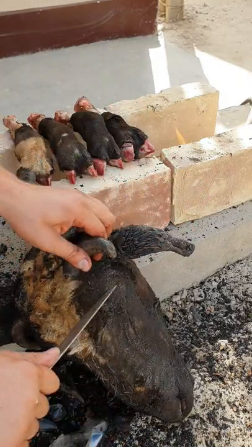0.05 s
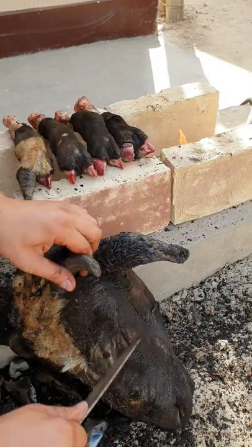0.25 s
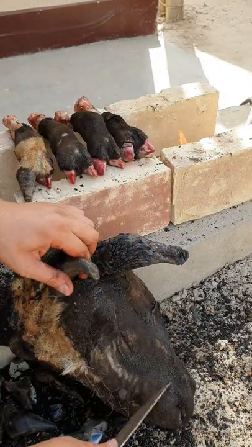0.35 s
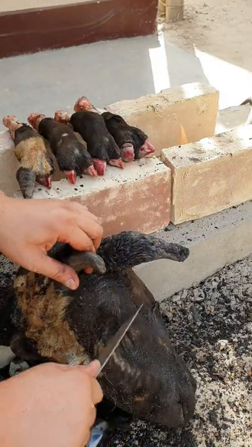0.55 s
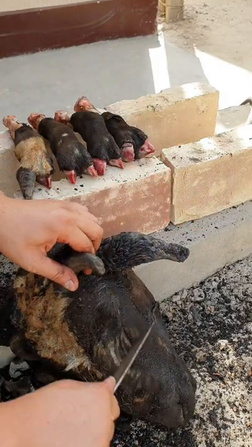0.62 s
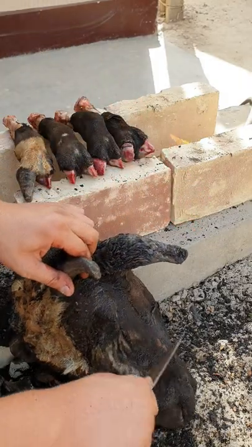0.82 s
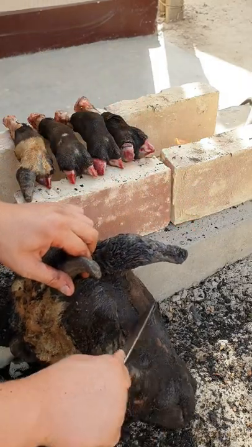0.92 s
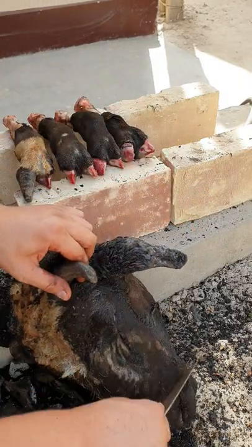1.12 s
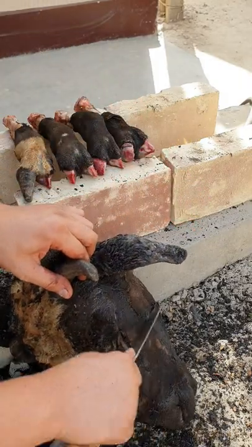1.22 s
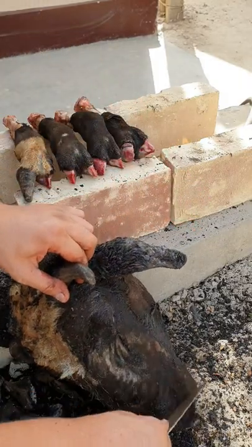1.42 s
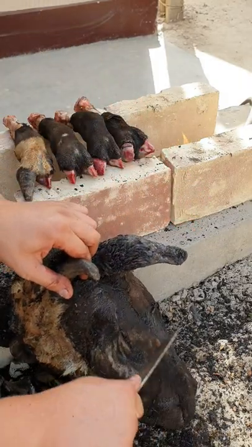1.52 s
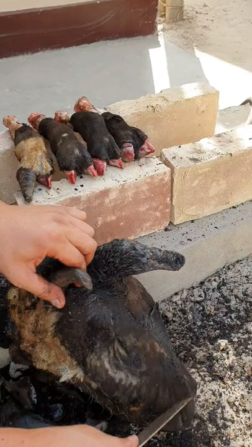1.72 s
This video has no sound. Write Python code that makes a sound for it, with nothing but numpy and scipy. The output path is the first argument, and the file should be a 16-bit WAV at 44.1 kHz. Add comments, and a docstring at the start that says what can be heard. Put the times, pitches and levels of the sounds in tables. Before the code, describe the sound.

Gritty knife scraping on charred skin, with a couple of loud, hollow metal bangs.

```python
"""Knife on charred hide, with banging sheet metal

A knife scrapes the charred hide of an animal's head in a walled yard: friction crumbles the crust in
short gritty strokes and rings the blade. Out of sight something big and hollow, probably a sheet-metal
door, bangs twice, rattles and booms away as its modes decay. A low hum and faint rumble lie beneath."""
import sys
import numpy as np
from scipy import signal
from scipy.fft import rfft, irfft, next_fast_len
from scipy.io import wavfile
from scipy.ndimage import map_coordinates

SR = 44100
rng = np.random.default_rng(int(sys.argv[2]) if len(sys.argv) > 2 else 0)


def to_wav(s):
    """Save 16-bit WAV."""
    ch = np.atleast_2d(s).T  # columns
    pcm = np.round(np.clip(ch, -1, 1) * 32767)  # PCM
    wavfile.write(sys.argv[1], SR, pcm.astype(np.int16))


N = 77175
T = np.arange(N) / SR

# Knife strokes: start_s, rise_s, hold_s, release_s, level_db, blade_relative_db
STROKES = [(0.12, 0.12, 0.17, 0.03, -46, -4), (0.62, .03, .13, 0.014, -46, -0.5),
           (0.867, 0.15, 0.089, 0.034, -51, -2.5), (1.294, 0.029, 0.1, 0.02, -53.5, 0.5),
           (1.486, .015, 0.003, 0.011, -57, 1.5), (1.605, 0.092, 0.014, 0.056, -53, -2.5)]
# The edge catching on the crust: start_s, t60_s, snap_db, knock_db
CATCHES = [(1.103, 0.015, -42, -62), (1.366, 0.048, -41.5, -45.5), (1.4122, 0.03, -35.5, -38.5),
           (1.423, 0.029, -48, -52), (1.429, 0.023, -49, -58)]
# Spectra of crumbling char, ringing blade, snapping crust and knocked skull: frequency_hz, density_db
CRUST_SPECTRUM = [(200, -20), (400, -5), (750, 7.5), (1200, 4), (2000, -0.5), (3000, -14), (4500, -0.5),
                  (7500, -5), (10500, 0.5), (15000, -4)]
BLADE_SPECTRUM = [(2000, -47), (2600, -8.5), (3050, -2.5), (3500, -10.5), (4500, -18.5), (7000, -68)]
SNAP_SPECTRUM = [(1500, -38), (2300, -19), (2800, 1), (3300, 7.5), (3700, -4), (4500, -10.5), (8000, -12.5),
                 (15000, -10.5)]
SKULL_SPECTRUM = [(400, -20), (650, -8), (780, 3), (950, -15), (1130, -5), (1400, -21), (2500, -35)]
# Left-right likeness of the knife: frequency_hz, coherence_ratio
KNIFE_COHERENCE = [(300, 1), (1400, .4), (8000, 0.1)]
# Blows on the sheet: start_s, rise_s, level_db, boom_db, clang_db, rattle_db, sizzle_db, t60_ratio
BLOWS = [(.0, 0.13, -44, 7.5, -1.5, -6.5, 2, 1.5), (0.127, 0.0079, -37, 1.5, 7, 1.5, -5, 2.3),
         (.207, 0.0089, -15, -7, 1, 1, -3.5, 0.83), (0.257, 0.014, -16.5, 0, -4, -22, -7, 0.31),
         (.293, 0.017, -22.5, 6, 1, 4.5, 3, 1.09), (.444, 0.0043, -22, -18, -4.5, -5.5, -5, 1.0),
         (0.483, 0.015, -27, 7.5, 3, 1.5, 1, 0.99), (.653, 0.0048, -22.5, 0.5, 6.5, 7, 12, 0.74),
         (0.693, 0.018, -29.5, -3, 8.5, 16.5, 3, 0.74), (0.783, 0.021, -30.5, 3.5, -3, -6, -9, 0.84),
         (.88, 0.038, -44, -6, 2.5, 7, -4, 0.97)]
# Spectrum of the sheet's dense, weak modes: frequency_hz, density_db
SHEET_SPECTRUM = [(25, -53), (55, -3), (90, -9), (200, -0.5), (300, -5.5), (420, -3), (600, -8), (830, -10),
                  (930, -13), (1080, -11.5), (1450, -13.5), (1900, -18.5), (3400, -16.5), (4400, -21),
                  (5200, -25), (6800, -26), (8000, -32), (12000, -37), (15500, -55)]
# Their decay by band, which each blow scales by its t60_ratio: centre_hz, base_t60_s
SHEET_DECAY = [(60, 1), (170, 1), (400, 0.9), (900, 0.68), (2000, 0.61), (4000, 0.54), (7000, 0.46),
               (14000, 0.49)]
# The three blows that excite the strong modes: start_s, rise_s
HEAVY_BLOWS = [(0.206, 0.0096), (0.29, 0.024), (0.65, 0.0042)]
# The sheet's strong modes: pitch_hz, t60_s, first_blow_db, second_blow_db, third_blow_db
STRONG_MODES = [(91.9, 0.58, -27.5, -24.5, -27.5), (148.8, 0.22, -26, -21, -47),
                (196, 1, -24.5, -24, -31.5), (259.4, 1, -29.5, -19, -41), (336.2, 0.36, -20.5, -38, -21),
                (373, 0.67, -18, -26.5, -44), (402.3, 0.84, -29, -52, -28), (443.8, 0.93, -22, -31, -34),
                (485, 0.49, -19.5, -49, -34), (544, 0.32, -26, -55, -42), (575, 0.42, -25, -47, -29.5),
                (669.3, 0.76, -27.5, -48, -26.5), (870, 0.43, -29.5, -65, -35), (1067, .5, -40, -39, -30.5),
                (1119, 0.15, -20.5, -62, -30), (1430, 0.16, -23.5, -58, -28),
                (1501, 0.32, -26.5, -50, -27.5), (1613, 0.47, -45, -43, -40), (1863, 0.47, -46, -40, -32.5),
                (2282, 0.61, -33.5, -52, -32.5), (3334, 0.61, -37, -46, -34), (3660, 0.65, -38, -42, -47),
                (4200, 0.48, -43, -50, -42)]
# Left-right likeness of the sheet and the rumble: frequency_hz, coherence_ratio
DISTANT_COHERENCE = [(60, 0.97), (130, 0.99), (290, 0.83), (640, 0.84), (1400, 0.15), (3100, 0.12),
                     (12000, 0.16)]
# Path of the swish before the first bang: time_s, centre_hz, level_db
SWISH_PATH = [(0, 3260, -73), (0.049, 3520, -62), (0.121, 4060, -55), (0.201, 4520, -43), (.24, 4580, -80)]
# Tones of the hum: pitch_hz, level_db, waver_db
HUM_TONES = [(89.7, -51.5, 2.5), (185.3, -63.5, 7.5)]
# Spectrum of the rumble: frequency_hz, density_db
RUMBLE_SPECTRUM = [(25, -21), (55, 2), (90, 8.5), (125, -6), (180, -8), (270, -9), (400, -10.5),
                   (800, -17.5), (1800, -26), (3500, -30), (7000, -39), (15000, -41.5)]

GRAINS_PER_S, GRIT_DB, CATCH_RISE_S = 700, 0.5, 0.0023
KNIFE_PAN_DB = -2  # left level relative to right
KNIFE_LAG_S, SHEET_LAG_S = 0.000225, 0.00012  # both arrive on the right first
BOOM_HZ, BODY_HZ, CLANG_HZ, RATTLE_HZ, SIZZLE_HZ = 110, 366, 1300, 3100, 11100  # a blow's tone controls
RIPPLE_DB, RIPPLE_STEP_HZ, MODE_WAVER_RAD = 2.5, 28, 0.45
YARD_T60_S, YARD_DB = 0.45, -14.5
SWISH_WIDTH_HZ, RUMBLE_DB, TOP_HZ = 570, -49, 15750


def knife():
    """Friction: the edge crumbles char and rings the blade; each catch snaps and knocks the skull."""
    pressure, blade_drive = np.zeros(N), np.zeros(N)
    for start, rise, hold, release, db, blade_db in STROKES:
        stroke = amp(db) * np.interp(T, start + np.cumsum([0, rise, hold, release]), [0, 1, 1, 0])
        pressure += stroke
        blade_drive += amp(blade_db) * stroke
    grit = unit_rms(amp(GRIT_DB * wobble(GRAINS_PER_S) + 2.2 * wobble(70.5)))
    out = grit * pressure * noise(CRUST_SPECTRUM, KNIFE_COHERENCE)
    out += amp(-1 + 1.6 * wobble(90)) * blade_drive * noise(BLADE_SPECTRUM, KNIFE_COHERENCE)
    for start, t60, snap_db, knock_db in CATCHES:
        snap = amp(snap_db) * noise(SNAP_SPECTRUM, KNIFE_COHERENCE)
        knock = amp(knock_db) * noise(SKULL_SPECTRUM, KNIFE_COHERENCE)
        out += struck(start, CATCH_RISE_S, t60) * (snap + knock)
    return delay_left(out, KNIFE_LAG_S) * amp([[KNIFE_PAN_DB / 2], [-KNIFE_PAN_DB / 2]])


def sheet_clatter():
    """High modal density: the struck sheet's weak modes merge into noise, the treble dying first."""
    out = np.zeros((2, N))
    centres, t60s = np.transpose(SHEET_DECAY)
    crossovers = [list(zip(centres, weights)) for weights in np.eye(len(centres))]
    peaks_db = RIPPLE_DB * rng.standard_normal(N)  # the same spectral peaks and dips for every blow
    for start, rise, db, boom, clang, rattle, sizzle, t60_ratio in BLOWS:
        tone = [(BOOM_HZ, boom), (BODY_HZ, 0), (CLANG_HZ, clang),
                (RATTLE_HZ, rattle), (SIZZLE_HZ, sizzle)]

        def band_gains(hz):
            ripple_db = np.interp(hz / RIPPLE_STEP_HZ, np.arange(N), peaks_db)
            ripple_db *= np.minimum(hz / CLANG_HZ, 1)  # shallower in the bass
            shares = np.array([[curve_at(crossover, hz)] for crossover in crossovers])
            return shares * amp(curve_at(tone, hz) + ripple_db)

        bands = filtered(noise(SHEET_SPECTRUM, DISTANT_COHERENCE), band_gains)
        for band, t60 in zip(bands, t60s):
            out += amp(db) * band * struck(start, rise, t60 * t60_ratio)
    return out


def sheet_ring():
    """Free vibration: each strong mode is a damped sinusoid in which the heavy blows' energies add."""
    out = np.zeros(N)
    for hz, t60, *levels in STRONG_MODES:
        energy = sum((amp(db) * struck(start, rise, t60)) ** 2
                     for (start, rise), db in zip(HEAVY_BLOWS, levels))
        phase = 2 * np.pi * (hz * T + rng.random()) + MODE_WAVER_RAD * wobble(24.97)
        out += np.sqrt(energy) * np.sin(phase)
    return out


def swish():
    """Modulation: low-passed noise on a rising carrier is a narrow hiss climbing to the first bang."""
    times, hz, db = np.transpose(SWISH_PATH)
    white = rng.standard_normal((2, N))
    band = unit_rms(filtered(white, lambda f: np.exp(-(f / SWISH_WIDTH_HZ) ** 2)))
    envelope = amp(np.interp(T, times, db)) * (T < times[-1])
    phase = 2 * np.pi * np.cumsum(np.interp(T, times, hz)) / SR
    return envelope * band * np.sqrt(2) * np.sin(phase)


def yard(x):
    """Reverberation: diffuse reflections from the walls form a short, exponentially decaying tail."""
    tail = rng.standard_normal((2, N)) * struck(start=0.0045, rise=0.0047, t60=YARD_T60_S)
    return signal.fftconvolve(x, tail / np.linalg.norm(tail[0]), axes=1)[:, :N]


def background():
    """Ambient noise: two low tones, wavering in level and phase, hum over a distant rumble."""
    hum = np.zeros(N)
    for hz, db, waver_db in HUM_TONES:
        amplitude = np.sqrt(2) * amp(db + waver_db * wobble(8.38))
        hum += amplitude * np.sin(2 * np.pi * hz * T + 0.2 * wobble(17))
    return hum + amp(RUMBLE_DB) * noise(RUMBLE_SPECTRUM, DISTANT_COHERENCE)


def amp(db):
    """Amplitude ratio of a level in decibels."""
    return 10 ** (np.asarray(db) / 20)


def unit_rms(x):
    """Normalisation to an rms of 1."""
    return x / np.sqrt(np.mean(x ** 2) + 1e-20)


def curve_at(points, hz):
    """Interpolation of (frequency_hz, value) points on a logarithmic frequency axis."""
    frequencies, values = np.transpose(points)
    return np.interp(np.log(hz + 1), np.log(frequencies + 1), values)


def wobble(knots_per_s):
    """Random modulation: a smooth spline through Gaussian knots."""
    return map_coordinates(rng.standard_normal(N), [T * knots_per_s], mode="wrap")


def filtered(x, response):
    """Linear filtering: the spectrum is multiplied by a frequency response."""
    size = next_fast_len(N + SR // 10)
    return irfft(rfft(x, size) * response(np.fft.rfftfreq(size, 1 / SR)), size)[..., :N]


def noise(spectrum, coherence):
    """Partial coherence: independent mid and side noises mix to coloured stereo noise of rms 1."""
    def mid_side_gains(hz):
        angle = np.arccos(np.clip(curve_at(coherence, hz), -1, 1)) / 2
        return amp(curve_at(spectrum, hz)) * [np.cos(angle), np.sin(angle)]

    mid, side = filtered(rng.standard_normal((2, N)), mid_side_gains)
    return unit_rms(np.array([mid + side, mid - side]))


def struck(start, rise, t60):
    """Damping: after a linear rise the envelope falls 60 dB every t60 seconds."""
    attack = np.clip((T - start) / max(rise, 1e-4), 0, 1)
    return attack * amp(-60 * np.maximum(T - start - rise, 0) / t60)


def delay_left(x, lag_s):
    """Arrival-time difference: the left channel trails the right."""
    return filtered(x, lambda hz: np.exp(1j * np.pi * hz * lag_s * np.array([[-1], [1]])))


def scene():
    """Superposition: the near knife and its reverberation, the farther sheet, swish and background."""
    scraping = knife()
    reflections = amp(YARD_DB) * yard(scraping)
    banging = delay_left(sheet_clatter() + sheet_ring(), SHEET_LAG_S)
    return scraping + reflections + banging + swish() + background()


def record(dry):
    """Band limiting: an ideal low-pass filter removes everything above TOP_HZ."""
    return filtered(dry, lambda hz: hz < TOP_HZ)


dry = scene()
out = record(dry)
to_wav(out)
```